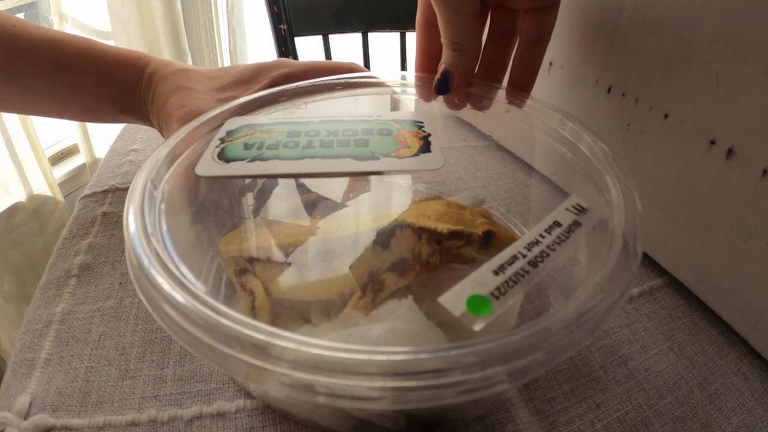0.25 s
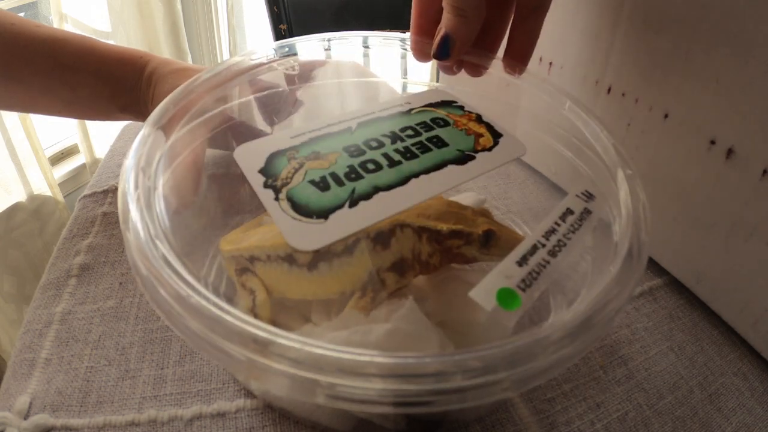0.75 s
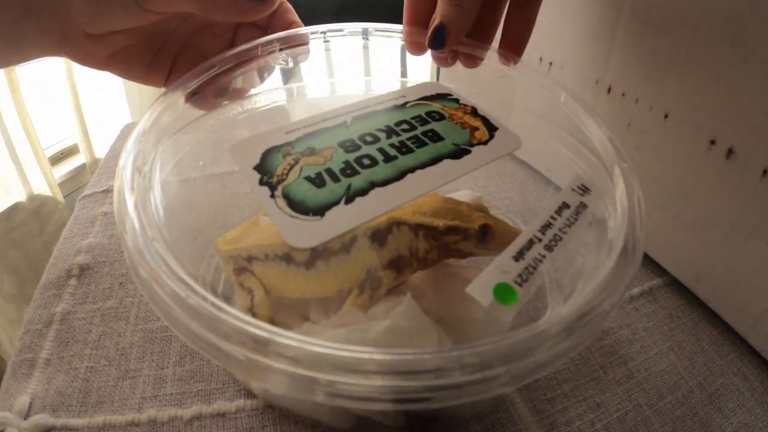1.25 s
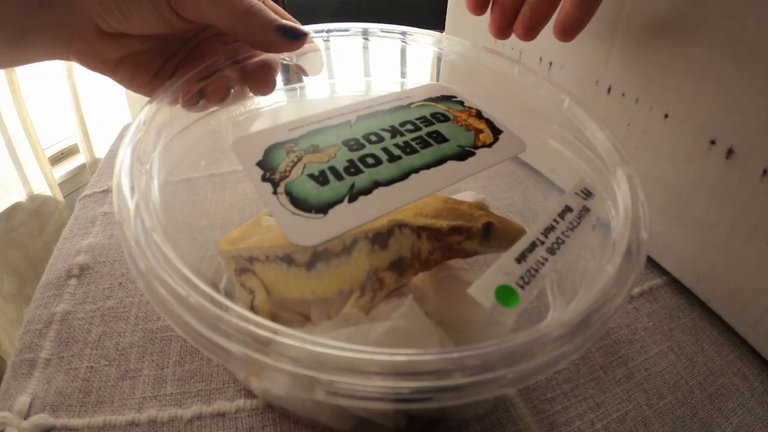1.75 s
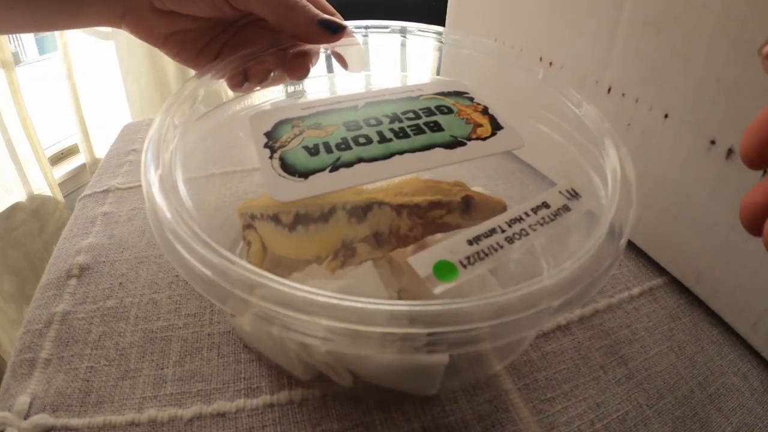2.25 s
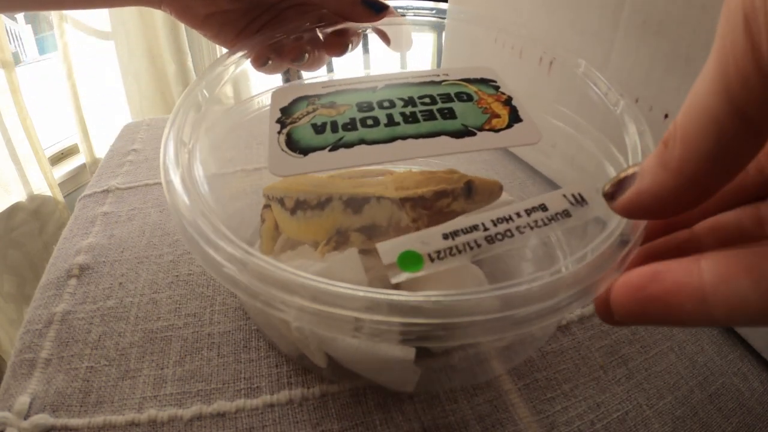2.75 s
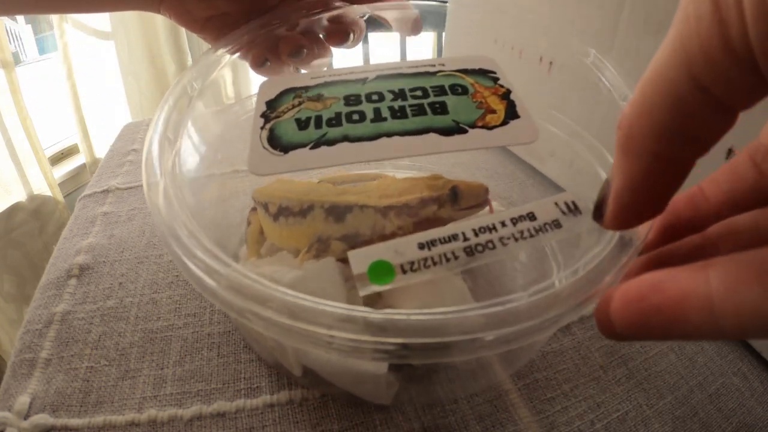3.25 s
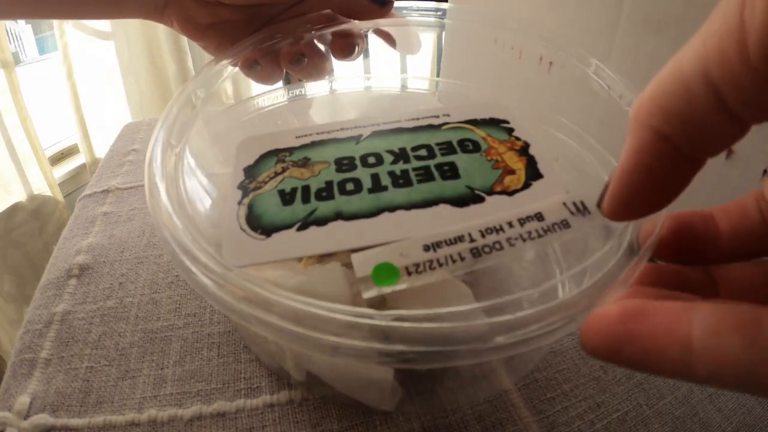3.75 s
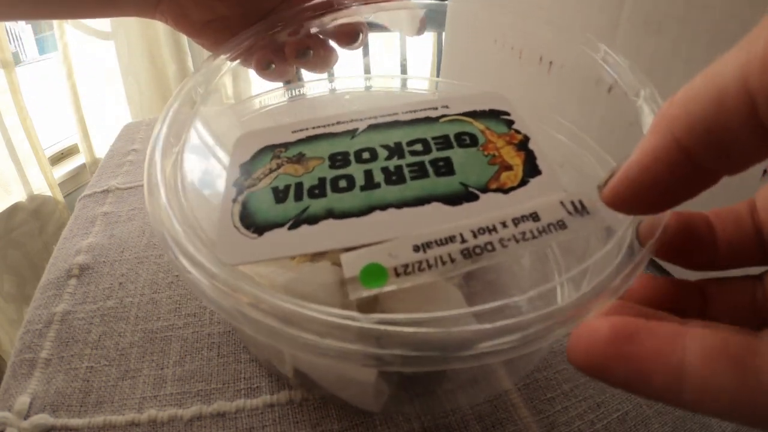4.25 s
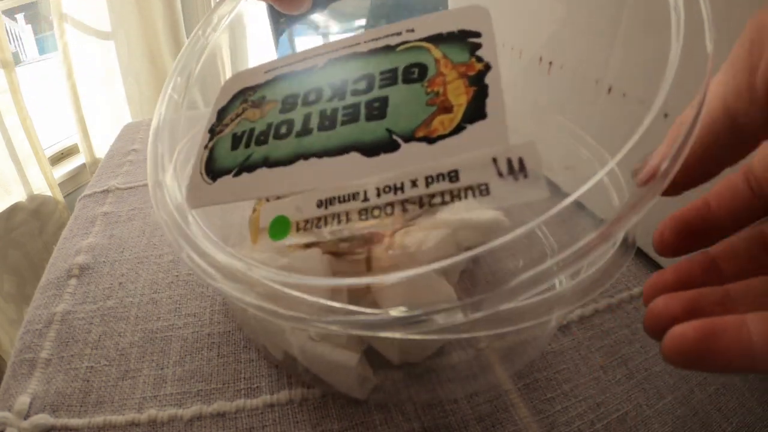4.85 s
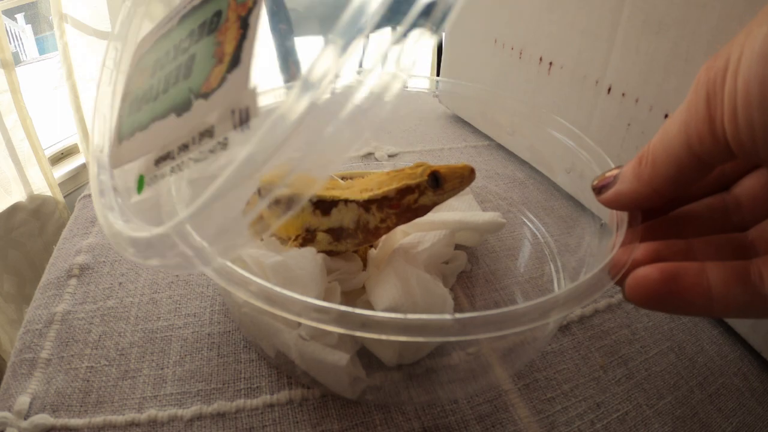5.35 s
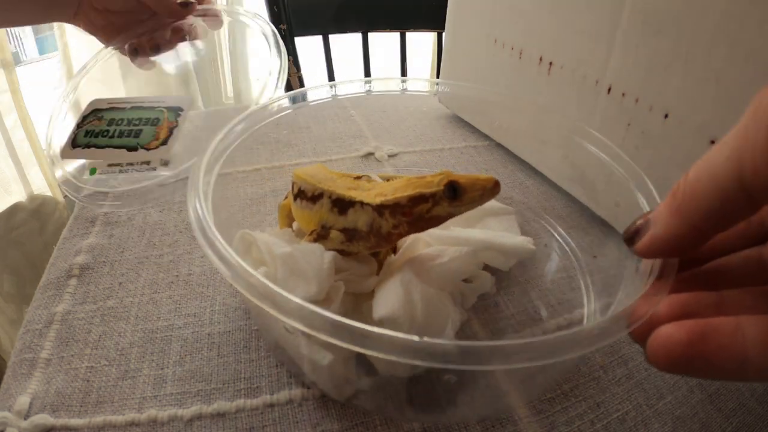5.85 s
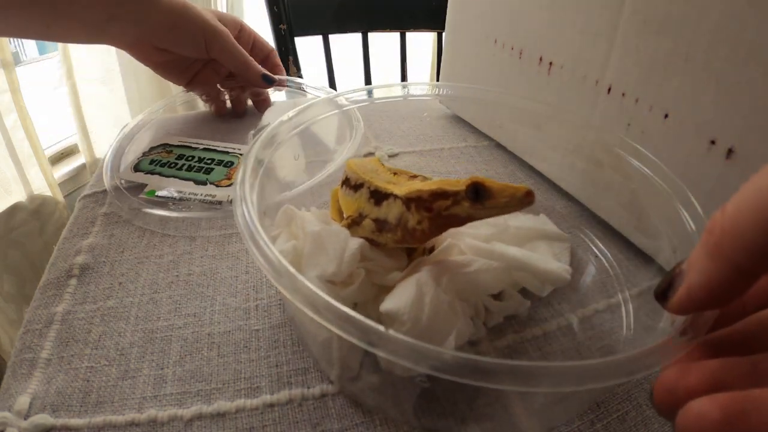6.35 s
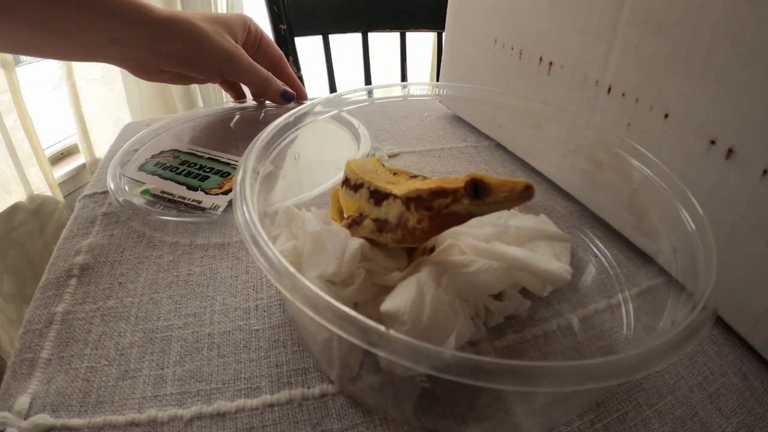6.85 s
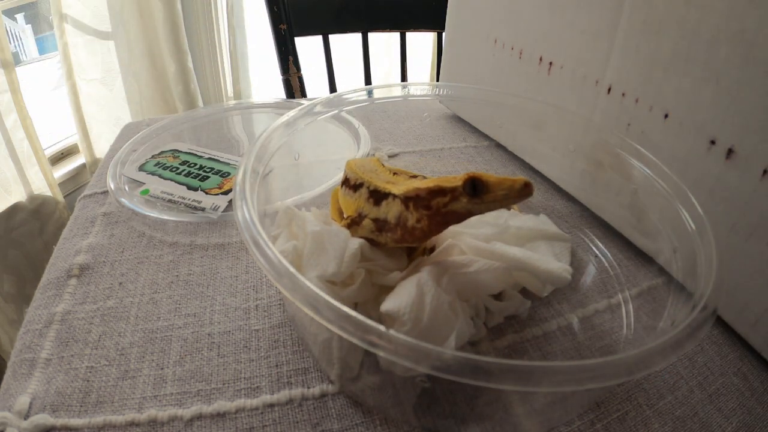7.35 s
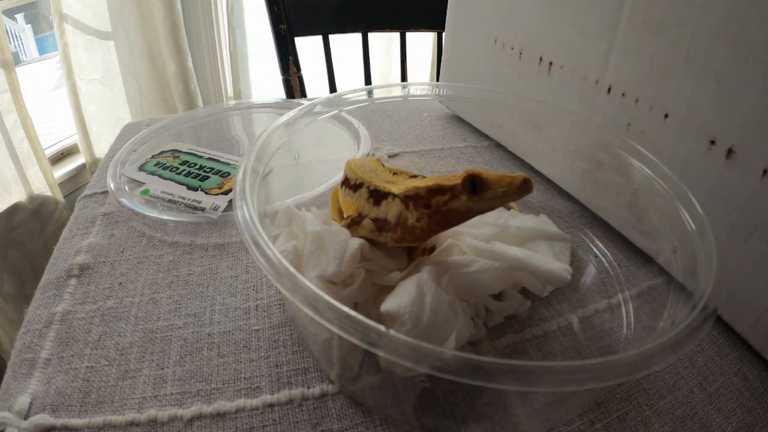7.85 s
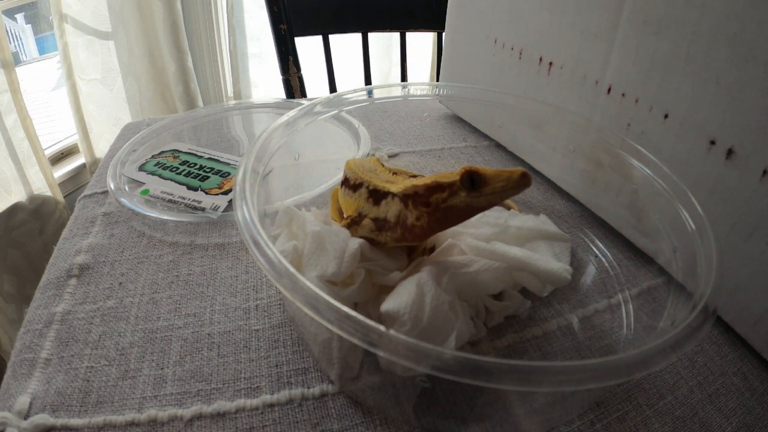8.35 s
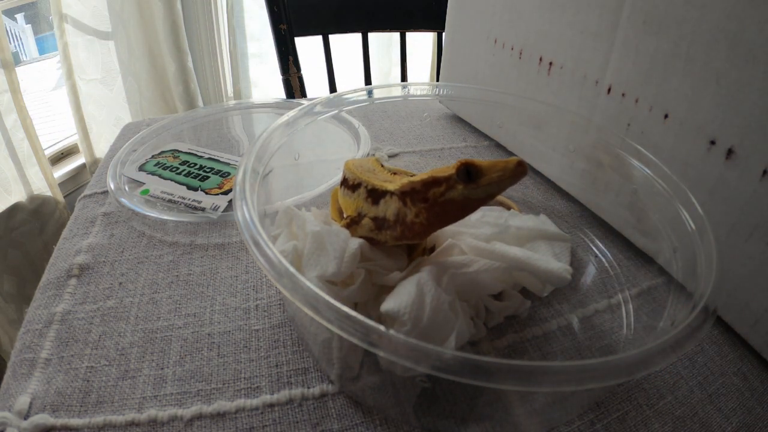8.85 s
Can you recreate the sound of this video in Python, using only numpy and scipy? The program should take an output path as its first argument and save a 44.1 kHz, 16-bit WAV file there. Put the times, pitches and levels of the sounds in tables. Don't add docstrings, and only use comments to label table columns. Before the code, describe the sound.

A close stereo microphone in a small quiet room, with low ventilation air and a faint steady motor hum throughout. From 0 to 0.6 seconds, finger pads rub thin plastic, with crisp snaps and hollow pops. Around 0.65 the loudest release cracks, ringing the tub briefly and thumping the table. Scattered snaps, scrapes and tiny squeaks follow until 1.7. From about 1.9 to 3 it is mostly quiet, with soft sleeve hiss, a small pop near 2.7 and light ticks. From 3.2 to 4.7 prying resumes, with brighter, denser snaps around 4.0 to 4.25 and hollow pops near 4.5 to 4.6. Weak ticks trail to 5.4, then a fabric brush. From 6.0 to 6.85 the lid scratches across cloth in short gritty strokes with clicks and dull bumps. Afterwards come sparse ticks, a faint rustle near 7.6, and a crinkling cluster peaking at 8.2, fading to room hum by 9.

```python
import sys
import numpy as np
from scipy import signal
from scipy.fft import rfft, irfft, next_fast_len
from scipy.io import wavfile
from scipy.ndimage import uniform_filter1d, map_coordinates

SR = 44100
rng = np.random.default_rng(int(sys.argv[2]) if len(sys.argv) > 2 else 0)


def materialize(psi):
    bounded = np.clip(np.atleast_2d(psi).T, -1, 1)
    quanta = np.round(bounded * 32767).astype(np.int16)
    wavfile.write(sys.argv[1], SR, quanta)


def convert_level_to_amplitude(level_db):
    exponent = np.asarray(level_db, float) / 20
    return 10 ** exponent


N = 400869


def along(points, hz):
    f, v = np.transpose(points)
    return np.interp(np.log(hz + 1), np.log(f + 1), v)


def curves(rows, outside=-120):
    s, *cols = np.transpose(rows)
    return [np.interp(np.arange(N) / SR, s, c, outside, outside) for c in cols]


def unit(x):
    return x / np.sqrt(np.mean(x ** 2) + 1e-20)


def peak(x):
    return x / np.max(np.abs(x[0]))


def noise(size):
    return rng.standard_normal((2, size))


def wobble(rate, size=N):
    coarse = np.arange(0, size + 16, 16)
    knots = rng.standard_normal(int(size * rate / SR) + 5)
    return np.interp(np.arange(size), coarse, map_coordinates(knots, [coarse * rate / SR]))


def filtered(x, response):
    m = next_fast_len(x.shape[-1] + 2048)
    return irfft(rfft(x, m) * response(np.fft.rfftfreq(m, 1 / SR)), m)[..., :x.shape[-1]]


def modes(table):
    def response(f):
        total = 0
        for k, (c, w, db) in enumerate(table):
            total = total + (-1) ** k * convert_level_to_amplitude(db) * 1j * f * w / (c * c - f * f + 1j * f * w)
        return total
    return response


def bent(table, scatter_db, shift=0.04):
    return [(c * (1 + shift * rng.normal()), w, g + rng.normal(0, scatter_db)) for c, w, g in table]


def grit(size, spiky_db, lumpy=1):
    sizes_db = spiky_db * (wobble(700, size) + lumpy * wobble(110, size))
    return unit(noise(size) * convert_level_to_amplitude(sizes_db))


def stroke(length, swell_db):
    t = np.arange(round((length + 0.067) * SR)) / SR
    start = np.sin(np.pi / 2 * np.clip(t / min(.25 * length, .012), 0, 1))
    swell = swell_db * (np.minimum(t / length, 1) - .5)
    release = -60 * np.maximum(t - 1.03 * length, 0) / 0.037
    return start * convert_level_to_amplitude(swell + release)


def add(track, s, sound):
    track[:, round(s * SR):][:, :sound.shape[1]] += sound


def spread(pair, alike):
    turn = lambda hz: np.arccos(np.clip(along(alike, hz), -1, 1)) / 2
    mid, side = filtered(pair, lambda hz: np.array([np.cos(turn(hz)), np.sin(turn(hz))]))
    return np.array([mid + side, mid - side])


# f/Hz, level/dB per Hz
FIZZ = [(2060, -46.5), (3500, -1.5), (4910, -0.5), (5810, -1), (6420, -6), (9110, -10), (11000, -22.5),
        (12400, -28.5), (15600, -62.5)]
# f/Hz, width/Hz, level/dB
RIM = [(4800, 930, 2), (5600, 400, -6), (6820, 2100, 4)]


def fizz(x):
    edge = modes(bent(RIM, scatter_db=5.5))
    return filtered(x, lambda f: convert_level_to_amplitude(along(FIZZ, f)) * (1 + np.abs(edge(f))))


# t/s, crack peak/dB, fizz over crack/dB, crack f/Hz, tub ring over crack/dB
SNAPS = [(0.1097, -35.5, -4.5, 3400, -4), (0.1498, -21.5, -15, 1320, -5), (0.194, -29.5, -5, 1653, 2.5),
         (0.6381, -8.5, -13, 1310, -2), (0.9697, -29, -6.5, 2980, -1), (1.4106, -29, -9.5, 1560, -6.5),
         (1.422, -32.5, -4, 2870, 2.5), (3.2789, -37, -10, 2174, -5.5), (3.575, -44, 0, 3760, -9),
         (3.5921, -31, -6, 1580, -10.5), (3.851, -41, -13.5, 1740, -4.5), (3.969, -27, 1.5, 1730, -10.5),
         (4.072, -33.5, -4, 2150, -6), (4.0999, -20.5, -5, 2600, -4), (4.2193, -20, 3.5, 2300, -5),
         (4.23, -29.5, -1.5, 2630, 3.5), (4.244, -17.5, -12, 2150, -11), (4.6418, -23.5, -8, 1652, -2.5),
         (5.1339, -39.5, -3, 1580, -2.5), (5.227, -44.5, -8, 1716, 4.5)]
# t/s, ring peak/dB, ring f/Hz, crack under ring/dB
POPS = [(0.2434, -23.5, 490, 11), (0.2938, -19, 512, 14.5), (0.301, -31.5, 596, 25.5),
        (0.4233, -34, 480, 31.5), (0.4664, -28, 500, 10.5), (0.5105, -37, 513, 13.5),
        (0.5844, -22, 586, 17.5), (0.6209, -25, 500, 11.5), (0.648, -17, 641, 3.5), (0.655, -16, 594, 5.5),
        (0.667, -9, 658, 1.5), (0.676, -20, 670, 0), (1.57, -21, 634, 7.5), (2.6979, -29, 605, 6.5),
        (2.8, -46.5, 726, 6), (2.997, -47, 680, 2), (3.477, -39, 450, 12), (3.506, -27.5, 628, 9),
        (3.598, -30, 600, 18), (3.706, -35, 565, 5), (3.723, -27, 643, 13), (3.741, -33, 670, 20),
        (3.7918, -46, 670, 11), (4.5205, -21.5, 595, 12), (4.527, -26.5, 588, 27), (4.6055, -19.5, 575, 5),
        (4.614, -32.5, 596, 27), (4.626, -36.5, 570, 3), (4.6758, -44.5, 670, -4)]
# t/s, crack peak/dB, crack f/Hz
TICKS = [(0.096, -44, 3600), (0.3666, -57, 4000), (0.5474, -60.5, 2980), (0.6147, -52, 3500),
         (3.558, -50, 3000), (7.9019, -60, 1300), (7.9643, -67, 1470), (0.737, -36, 2204),
         (0.9962, -43.5, 2357), (1.214, -52, 2855), (1.6808, -36.5, 2850), (2.84, -48, 2240),
         (2.966, -38.5, 2070), (3.113, -50, 1570), (3.24, -38, 2070), (3.758, -42.5, 1730),
         (3.835, -52, 2620), (4.055, -35.5, 2680), (4.194, -51, 3010), (4.116, -43, 1790),
         (4.382, -48, 3640), (4.513, -34, 2270), (5.16, -44, 3580), (5.4017, -53, 3710),
         (6.9603, -49, 3306), (7.75, -43.5, 3420), (7.79, -49, 1490), (8.539, -51, 2600)]


def releases():
    ring_hz = lambda db: 784 + 6.5 * db
    found = [(*snap, ring_hz(snap[1])) for snap in SNAPS]
    for s, db, hz, under_db in POPS:
        pop_fizz_db, pop_hz = (-13, 2300) if s > 4 else (-19.5, 1250)
        found.append((s, db - under_db, pop_fizz_db, pop_hz, under_db, hz))
    for s, db, hz in TICKS:
        tick_fizz_db = -15.5 + 9 * np.log2(hz / 1e3)
        found.append((s, db, tick_fizz_db, hz, -5, ring_hz(db)))
    return found


# f/Hz, width/Hz, level/dB
LID = [(1150, 260, -3), (1600, 300, -2), (2200, 320, -2), (2750, 380, -3), (3300, 480, -6)]


def snaps():
    track, t = np.zeros((2, N + SR)), np.arange(2200) / SR
    for s, db, fizz_db, hz, ring_db, ring_hz in releases():
        burst = noise(len(t)) * (1 - np.exp(-t / 0.0008))
        lid = modes(sorted(bent(LID, scatter_db=1.5) + [(hz, 350, 6)]))
        sharp = burst * (convert_level_to_amplitude(-60 * t / 0.0051) + 0.1201 * convert_level_to_amplitude(-60 * t / 0.031))
        tilt = lambda f: (1 + f / hz) ** (fizz_db / 7.5)
        crack = filtered(sharp, lambda f: lid(f) * modes([(2400, 5000, 0)])(f) * tilt(f))

        # ratio to the ring pitch, width Hz, dB
        tub = [(.74, 90, -9), (.96, 55, 0), (1.14, 65, -3), (1.4, 120, -8), (2.2, 170, -8)]
        ring = 0
        for ratio, w, g in tub:
            strength = convert_level_to_amplitude(g + rng.normal(0, 1.5)) * np.array([[1], [.3 * rng.normal()]])
            ring = ring + strength * np.exp(-np.pi * w * t) * np.sin(2 * np.pi * ring_hz * ratio * t)
        ring = ring * (1 - np.exp(-t / 0.0009))

        bright = fizz(burst * (1 - np.exp(-t / 0.00039)) * convert_level_to_amplitude(-60 * t / 0.013))
        creep = burst[:, ::-1][:, :700] * np.exp(-t[699::-1] / 0.0014)
        creak = filtered(creep, lambda f: lid(f) * tilt(f) + convert_level_to_amplitude(along(FIZZ, f)) / 2)
        add(track, s - 700 / SR, convert_level_to_amplitude(db - 23) * peak(creak))
        add(track, s - .0008, convert_level_to_amplitude(db) * (peak(crack) + convert_level_to_amplitude(fizz_db) * peak(bright)))
        add(track, s, convert_level_to_amplitude(db + ring_db) * peak(ring))
    return track[:, :N]


# t/s, length/s, level/dB, swell/dB
NAILS = [(0.202, 0.022, -60.5, 4.5), (0.265, 0.037, -68, 6), (0.31, .07, -70, 0), (0.69, .11, -58, -7),
         (4.551, 0.031, -62, -7), (0.828, 0.014, -59, -0.5), (0.946, 0.032, -56.5, 9),
         (1.415, 0.092, -54, -8), (1.513, 0.037, -46.5, -5), (1.666, 0.053, -60, 1),
         (2.902, 0.047, -50.5, 2), (3.982, 0.035, -47, 17.5), (4.022, 0.032, -52, -5),
         (4.192, 0.027, -52, 22), (4.217, 0.02, -43.5, -28), (4.248, 0.053, -53.5, -12),
         (4.353, 0.015, -56, -1), (4.765, 0.037, -67.5, 9), (5.234, 0.031, -67, 6),
         (5.41, 0.043, -61.5, -13), (6.942, 0.047, -68, 3)]
# t/s, length/s, level/dB, swell/dB
PADS = [(0, 0.11, -53.5, -9.5), (0.084, 0.056, -51.5, -10), (0.633, 0.053, -29.5, -10.5),
        (0.69, 0.059, -45.5, -9), (0.757, 0.06, -64, -4.5), (0.993, 0.026, -57.5, -13),
        (1.569, 0.03, -51, -8), (3.199, 0.057, -69, 31), (3.39, 0.088, -68, -7), (3.422, 0.036, -67.5, -8),
        (3.475, 0.051, -53, 3), (3.574, 0.021, -53.5, 15), (3.608, .035, -51, -16),
        (3.706, 0.063, -53, -11), (3.851, 0.082, -65.5, -11), (4.481, 0.051, -58, 2),
        (4.577, 0.018, -62.5, 15), (4.669, 0.044, -61, -29), (5.113, 0.033, -61, 12.5)]


def scuffs():
    track = np.zeros((2, N + SR))
    rubs = [(*row, -1.5, -2) for row in NAILS] + [(*row, -7.5, 6.5) for row in PADS]
    tub_modes = modes([(400, 200, -2), (580, 130, 0), (800, 320, -5)])
    for s, length, db, swell_db, fizz_db, ring_db in rubs:
        push = stroke(length, swell_db)
        slips = grit(len(push), spiky_db=2.6, lumpy=.6)
        held = modes([(c, 1.7 * w, g) for c, w, g in bent(LID, scatter_db=2.2)])
        tilt = lambda f: (1 + f / 1500) ** (fizz_db / 8)
        lid = filtered(slips, lambda f: held(f) * modes([(2000, 4500, 0)])(f) * tilt(f))
        tub = filtered(slips, lambda f: tub_modes(f) * modes([(560, 700, 0)])(f))
        rub = unit(lid) + convert_level_to_amplitude(fizz_db) * unit(fizz(slips)) + convert_level_to_amplitude(ring_db) * unit(tub)
        add(track, s, convert_level_to_amplitude(db) * push * rub)
    return track[:, :N]


# t/s, peak/dB, f/Hz
BUMPS = [(0.111, -37.5, 128.5), (0.195, -34, 150.4), (0.295, -33, 127.2), (0.371, -43.5, 106.9),
         (0.47, -38, 163.1), (0.583, -37, 183.3), (0.636, -16, 155.6), (0.641, -23.5, 48.1),
         (0.653, -21, 108.9), (0.667, -15.5, 101.7), (0.701, -26.5, 142.4), (0.964, -44.5, 203.5),
         (1.423, -38.5, 219), (1.459, -38.5, 139), (1.572, -36.5, 90.8), (1.711, -46, 156),
         (3.28, -45, 166.3), (3.508, -36.5, 166.2), (3.593, -33, 143.4), (3.617, -37.5, 93.6),
         (3.714, -32, 60), (3.73, -30, 189.7), (4.098, -39.5, 167.2), (4.238, -35, 158.7),
         (4.249, -43.5, 60), (4.4, -44, 239), (4.517, -37, 301), (4.606, -40.5, 126.3), (5.136, -39, 65.1),
         (6.1554, -36, 141), (6.61, -44, 129), (7.851, -56.5, 53.3), (8.196, -41, 325), (8.231, -40, 229.6)]


def bumps():
    track, t = np.zeros((2, N + SR)), np.arange(SR // 4) / SR
    laid_s = 6
    for s, db, hz in BUMPS:
        t60_s = (0.024 + 6.6 / hz) * (1.3 if laid_s < s < laid_s + 1 else 1)
        fade = convert_level_to_amplitude(-60 * t / t60_s) * (1 - np.exp(-t / .003))
        dull = unit(filtered(noise(len(t)), lambda f: modes([(hz * 1.5, 160, 0)])(f) ** 2))
        dull_share = .3 if s > laid_s else 0.45
        heave = np.sin(2 * np.pi * 38 * t) * convert_level_to_amplitude(-60 * t / 0.29) * (1 - np.exp(-t / 0.027))
        knock = fade * (np.sin(2 * np.pi * hz * t) + dull_share * dull)
        add(track, s, convert_level_to_amplitude(db + 6.5) * (knock + 0.036 * heave))
    return track[:, :N]


# t/s, length/s, level/dB, swell/dB, edge pitch f/Hz
SLIDE = [(6.011, 0.042, -53.5, -6, 3150), (6.098, 0.062, -53.5, 13, 2660), (6.163, 0.037, -54.5, 0, 2450),
         (6.197, 0.088, -52, 1.5, 2350), (6.271, 0.057, -48.5, 9, 2450), (6.333, 0.039, -47, -8, 2310),
         (6.386, 0.051, -60.5, 1, 2440), (6.443, 0.055, -50, 11, 2320), (6.497, 0.018, -46.5, 15, 2360),
         (6.52, 0.048, -50.5, -6, 2300), (6.563, 0.062, -49.5, -6, 2450), (6.62, 0.065, -53, 9.5, 2420),
         (6.676, 0.064, -48, -3, 2300), (6.73, 0.045, -53.5, -9, 2390), (6.784, 0.062, -62, 0, 2480)]
# share of its pitch, width share, level/dB
EDGE = [(.44, 0.16, 4), (0.859, 0.07, 1.5), (1, 0.13, 2), (1.299, 0.073, -5), (1.42, .07, -4.5),
        (2.099, 0.049, -3)]


def slide():
    track = np.zeros((2, N + SR))
    for s, length, db, swell_db, hz in SLIDE:
        push = uniform_filter1d(stroke(length, swell_db), size=500, mode="constant")
        slips = grit(len(push), spiky_db=2.5, lumpy=.6) * convert_level_to_amplitude(.7 * wobble(60, len(push)))
        edge = modes(bent([(hz * c, hz * w, g) for c, w, g in EDGE], scatter_db=2.5, shift=0.014))
        broad, low = modes([(3000, 3600, 0)]), modes([(1080, 250, -20)])
        thin = lambda f: 1 / (1 + (1850 / (f + 1)) ** 7)
        body = filtered(slips, lambda f: (edge(f) + 0.012) * broad(f) * thin(f) + low(f) * f / 1500)
        air = filtered(fizz(slips), lambda f: 1 + np.abs(modes([(13500, 4000, -8)])(f)))
        fizz_db = -1 - 9 * (s - SLIDE[0][0]) - 0.23 * (db + 47.0)
        add(track, s, convert_level_to_amplitude(db) * push * (unit(body) + convert_level_to_amplitude(fizz_db) * unit(air)))
    return track[:, :N]


# t/s, length/s, level/dB, f/Hz
SQUEAKS = [(0, .09, -46.5, 323), (0, 0.1, -52, 1750), (0, 0.062, -55.5, 2470), (1.419, 0.062, -50, 2930),
           (1.42, 0.079, -57.5, 1680), (1.513, 0.024, -43, 5600), (1.554, 0.015, -50, 5340),
           (1.682, 0.023, -57, 2970), (1.685, 0.021, -62, 5600), (8.091, 0.062, -63, 1480),
           (8.203, 0.043, -73, 4000), (3.205, .05, -63, 2150), (3.268, 0.042, -56, 2140),
           (3.39, 0.032, -58, 2070), (3.42, 0.014, -60.5, 5250), (3.5, 0.019, -44, 2180),
           (4.208, .01, -55, 7500), (4.49, 0.012, -53, 2496), (4.59, 0.015, -51, 3050),
           (.3, 0.087, -56, 550), (.44, 0.054, -52.5, 522), (4.539, 0.022, -46.5, 540),
           (3.997, 0.019, -36.5, 2570), (3.995, 0.022, -36.5, 5600), (4.245, 0.057, -47.5, 2520),
           (4.358, 0.079, -55, 403), (4.853, 0.2, -73.5, 4800)]


def squeaks():
    track = np.zeros((2, N + SR))
    for s, length, db, hz in SQUEAKS:
        push = stroke(length, swell_db=-2.5)
        slips = grit(len(push), spiky_db=2.0)
        tone = filtered(slips, lambda f: modes([(hz, .16 * hz, 0)])(f) ** 2)
        add(track, s, convert_level_to_amplitude(db) * push * unit(tone))
    return track[:, :N]


# t/s, peak/dB, f/Hz, upper f/Hz,
# upper level/dB
CLICKS = [(0.1496, -22, 2500, 4240, -8), (0.351, -54, 1200, 2300, -13), (0.374, -50, 1250, 2081, -15),
          (0.888, -56, 2800, 5500, 3), (1.538, -27, 3020, 5700, -2), (1.558, -34, 5300, 7300, -3.5),
          (1.5688, -28, 1520, 2520, -1), (0.6672, -12, 1390, 2220, 4), (0.676, -22, 4930, 2500, 0),
          (0.645, -27, 2220, 7560, 1), (2.696, -42, 1530, 950, -3), (2.801, -49, 1300, 2400, -12),
          (3.36, -50, 1700, 2300, -10), (3.423, -45, 2300, 5470, -9), (3.452, -48, 1720, 5000, -7),
          (3.89, -47.5, 1620, 2620, -5), (4.147, -54, 1500, 3000, -2), (4.5204, -30, 2390, 4800, -9),
          (5.876, -53, 3400, 5550, -3.5), (6.088, -43.5, 3310, 7460, -11), (6.1565, -38, 3470, 900, 5),
          (6.271, -26, 2640, 6040, -13), (6.3375, -29.5, 2470, 5140, -11), (6.4688, -39, 2340, 4000, 1),
          (6.5045, -33.5, 2360, 4370, 6), (6.554, -40, 2400, 4000, -7), (6.566, -39, 3330, 6800, -11),
          (6.608, -31, 1700, 2780, -3.5), (6.6766, -41, 2400, 1540, 3), (6.8147, -51, 3460, 2300, 6),
          (7.629, -50, 1330, 2600, -13), (7.656, -48.5, 1190, 2400, -18), (7.7034, -57, 2010, 1200, -2),
         (8.0466, -48.5, 1060, 1690, -9), (8.0817, -45.5, 950, 1820, -6), (8.098, -51, 1520, 4300, -16),
         (8.125, -43, 3760, 5700, 1), (8.131, -47, 1510, 3050, -8), (8.157, -46, 3000, 1700, -3),
         (8.165, -46, 905, 2300, -19), (8.174, -44, 1300, 2300, -10), (8.197, -35, 4000, 1500, 5),
         (8.2228, -42, 1680, 3960, -9), (8.2359, -22.5, 1520, 4000, -6.5), (8.246, -41, 2900, 4000, -5)]


def clicks():
    track, t = np.zeros((2, N + SR)), np.arange(1300) / SR
    fade = (1 - np.exp(-t / .001)) * (convert_level_to_amplitude(-60 * t / 0.008) + .08 * convert_level_to_amplitude(-60 * t / 0.042))
    for s, db, hz, upper_hz, upper_db in CLICKS:
        burst = noise(len(t)) * fade
        part = modes([(hz, 0.15 * hz, 0), (upper_hz, 0.15 * upper_hz, upper_db)])
        body = filtered(burst, lambda f: part(f) * f / (f + hz / 2))
        add(track, s - .0008, convert_level_to_amplitude(db) * (peak(body) + convert_level_to_amplitude(-14) * peak(fizz(burst))))
    return track[:, :N]


# t/s, level/dB
GRIP = [
    (0, -59.5),
    (.4, -80),
    (.9, -65.5),
    (1.3, -97.5),
    (2.6, -74.5),
    (3.9, -68),
    (4.5, -64.5),
    (4.9, -70.5),
    (5.5, -99.5),
]


def grip():
    db, = curves(GRIP)
    slips = grit(N, spiky_db=2.5) * convert_level_to_amplitude(5.2 * wobble(23))
    lid = filtered(slips, modes([(c, 0.67 * w, g) for c, w, g in LID]))
    return convert_level_to_amplitude(db) * (unit(lid) + convert_level_to_amplitude(-3.5) * unit(fizz(slips)))


def sway():
    db = -79 + 0.69 * (np.maximum(curves(GRIP)[0], -85) + 85)
    rumble = filtered(noise(N), lambda f: modes([(40, 45, 0)])(f) ** 2)
    return convert_level_to_amplitude(db) * unit(convert_level_to_amplitude(3 * wobble(17)) * rumble)


# t/s, level/dB
RUSTLE = [(7.36, -80.5), (7.5, -69.5), (7.6, -65.5), (7.76, -66.5), (7.84, -73), (8.02, -86), (8.1, -65),
          (8.2, -57), (8.24, -47), (8.3, -69.5), (8.38, -83)]
# f/Hz, level/dB per Hz
CLOTH = [(410, -7), (700, 1), (840, -6), (1230, -5.5), (2220, -6.5), (4000, -14.5), (5200, -63),
         (8800, -120)]


def rustle():
    db, = curves(RUSTLE)
    slips = grit(N, spiky_db=2.2)
    pop = modes([(1450, 250, 3)])
    folds = filtered(slips, lambda f: convert_level_to_amplitude(along(CLOTH, f)) * (1 + np.abs(pop(f))))
    return convert_level_to_amplitude(db) * (unit(folds) + convert_level_to_amplitude(-6.5) * unit(fizz(slips)))


# t/s, length/s, level/dB, swell/dB
SLEEVES = [
    (1.946, 0.19, -79, 18),
    (2.139, 0.92, -73.5, -8),
    (5.498, 0.65, -72.5, 13),
    (7.451, 0.31, -79, 28),
]
# f/Hz, level/dB per Hz
SLEEVE = [(1500, -7.5), (3200, 2), (5000, -1), (8000, 0), (11000, -8.5), (14500, -22), (16000, -56)]


def sleeves():
    track = np.zeros((2, N + SR))
    for s, length, db, swell_db in SLEEVES:
        push = uniform_filter1d(stroke(length, swell_db), size=2000, mode="constant")
        hiss = filtered(grit(len(push), spiky_db=1.1), lambda f: convert_level_to_amplitude(along(SLEEVE, f)))
        add(track, s, convert_level_to_amplitude(db + 1.84 * wobble(6.9, len(push))) * push * unit(hiss))
    return track[:, :N]


# f/Hz, t60/s
ROOM = [(200, 0.56), (2000, 0.16), (10000, 0.051)]


def walls(x):
    hz, t, z = signal.stft(noise(SR // 2), SR, nperseg=256)
    tail = signal.istft(z * convert_level_to_amplitude(-60 * t / along(ROOM, hz)[:, None]), SR, nperseg=256)[1]
    late = np.pad(x, (260, 0))[None]
    return signal.fftconvolve(late, tail / np.linalg.norm(tail[0]), axes=1)[:, :N]


# f/Hz, level/dB per Hz
AIR = [(53, -69), (95, -42), (168, -3.5), (300, -14.5), (484, -16.5), (690, -22), (830, -33), (1360, -27),
       (1730, -31), (2600, -36), (3030, -31), (3680, -41), (5780, -37), (10000, -47), (15600, -65)]
# f/Hz, likeness
AIR_ALIKE = [(60, 0.64), (180, 1), (550, 0.89), (1650, 0.395), (4970, 0.45), (15000, 0.35)]


def ventilation():
    z = signal.stft(noise(N), nperseg=1024)[2]
    field = uniform_filter1d(uniform_filter1d(rng.standard_normal(z.shape[1:]), 5, 0), 8, 1)
    patchy = signal.istft(z * convert_level_to_amplitude(0.5 * unit(field)), nperseg=1024)[1][:, :N]
    air = filtered(patchy, lambda f: convert_level_to_amplitude(along(AIR, f)))
    return convert_level_to_amplitude(-61) * unit(spread(air, AIR_ALIKE))


# multiple of the shaft, level/dB
MOTOR = [(3, -67.5), (5, -72), (9, -68), (10, -79), (49, -95.5), (50, -83.5), (51, -82.5), (57, -90)]
# t/s, level/dB
LOAD = [(0, -2.5), (2.2, -1.5), (5.3, -0.5), (5.45, -6), (5.85, -12.5), (6, 0.5), (7, -1), (7.9, 1),
        (8.2, -5.5), (9.09, 1)]


def motor():
    load_db, = curves(LOAD, outside=0)
    shaft_hz = 58.62
    turn = 2 * np.pi * shaft_hz * (np.arange(N) / SR + 2e-5 * wobble(1.5))
    hum = 0
    for order, db in MOTOR:
        strength = np.sqrt(2) * convert_level_to_amplitude(db + 3.5 * wobble(7.4) + load_db * (order > 8))
        phase = rng.uniform(0, [[6], [1]]).cumsum()[:, None]
        hum = hum + strength * np.sin(order * turn + phase)
    return hum


# t/s, left over right level/dB
WHERE = [
    (0, -1),
    (1.2, -0.5),
    (3.5, -2),
    (5.2, -1.5),
    (6.2, 0.5),
    (7.5, 2),
    (9.09, -6),
]
# f/Hz, likeness
NEAR_ALIKE = [(100, .98), (700, .98), (2000, .9), (5000, 0.6), (12000, 0.3)]


def scene():
    plastic = snaps() + scuffs() + bumps() + slide() + squeaks() + clicks()
    near = plastic + grip() + sway() + rustle() + sleeves()
    pan_db, = curves(WHERE, outside=0)
    direct = spread(near, NEAR_ALIKE) * convert_level_to_amplitude([pan_db / 2, -pan_db / 2])
    return direct + convert_level_to_amplitude(-21) * walls(near[0]) + ventilation() + motor()


# f/Hz, phase/rad
PORTS = [(100, 0.19), (1900, 0.54), (5000, 0.88), (8000, 0.31)]


def ports(x):
    right_db = [(150, 0.42), (1500, -0.5), (9500, -0.9), (12000, 2.5)]  # (Hz, dB up right, down left)

    def response(f):
        lag = np.exp(-.5j * np.array([[1], [-1]]) * along(PORTS, f))
        colour = convert_level_to_amplitude([[-1], [1]] * along(right_db, f))
        return lag * colour * np.clip((15750 - f) / 2200, 0, 1)
    return filtered(x, response)


def band_limit(x):
    return signal.sosfilt(signal.butter(12, 15740, fs=SR, output="sos"), x)


def record(dry):
    x = ports(dry)
    level_db = 20 * np.log10(uniform_filter1d(np.abs(x).max(0), 400) + 1e-6)
    over_db = np.maximum(level_db + 30, 0)
    keep = np.exp(-1 / (.4 * SR))
    duck_db = signal.lfilter([1 - keep], [1, -keep], over_db)
    x = x * convert_level_to_amplitude(-4.5 * duck_db)
    x = x / (1 + np.abs(x / .6) ** 4) ** (1 / 4)
    return band_limit(x)


dry = scene()
out = record(dry)
materialize(out)
```